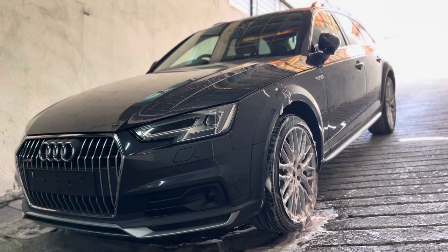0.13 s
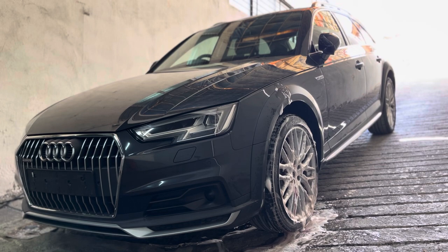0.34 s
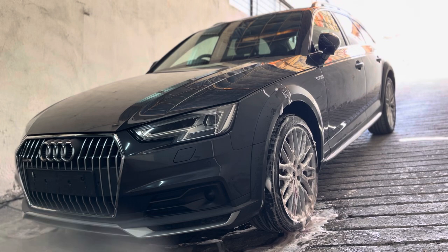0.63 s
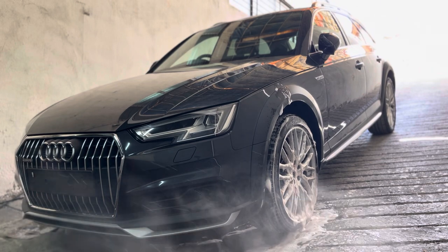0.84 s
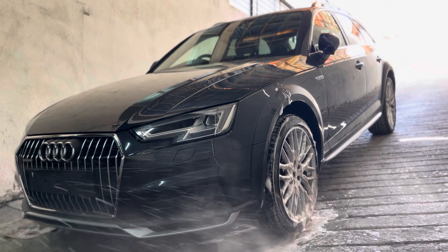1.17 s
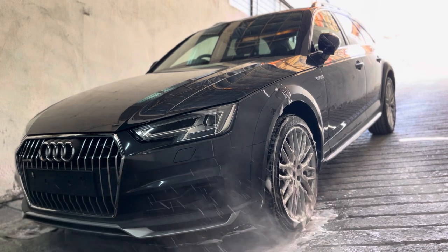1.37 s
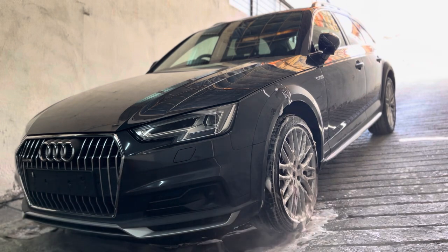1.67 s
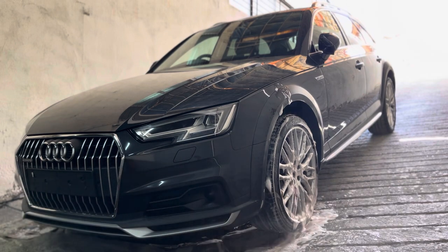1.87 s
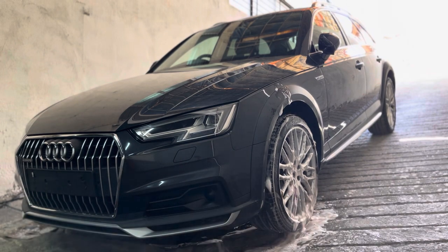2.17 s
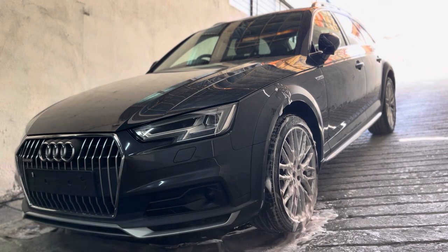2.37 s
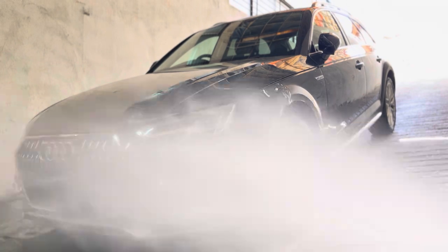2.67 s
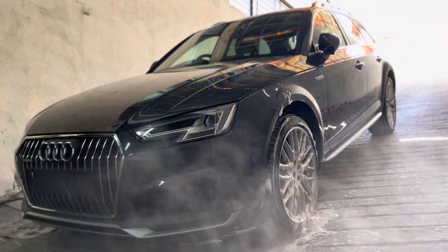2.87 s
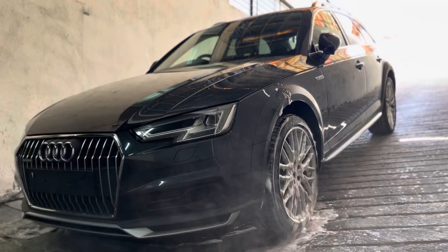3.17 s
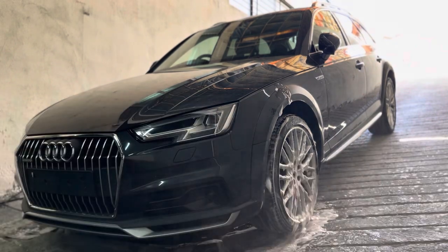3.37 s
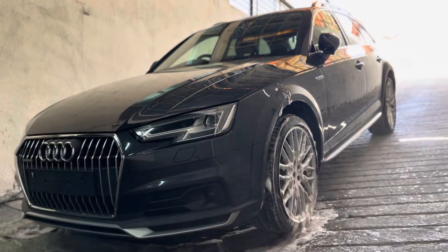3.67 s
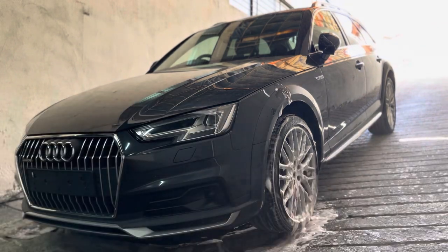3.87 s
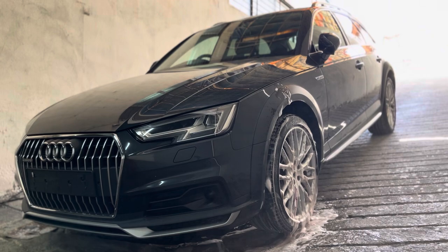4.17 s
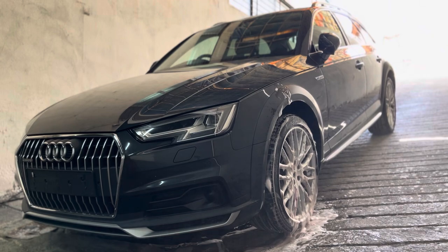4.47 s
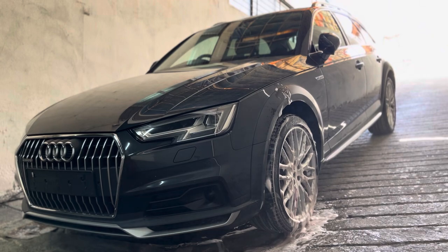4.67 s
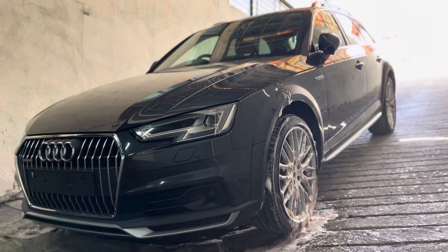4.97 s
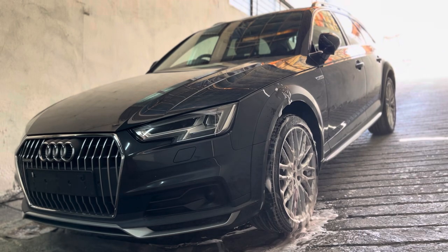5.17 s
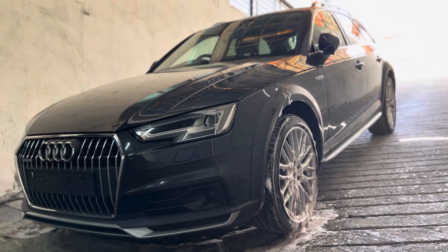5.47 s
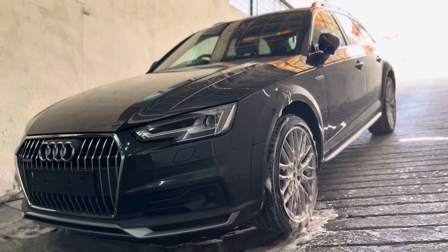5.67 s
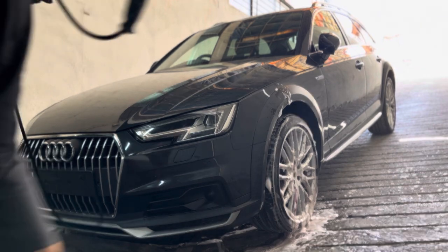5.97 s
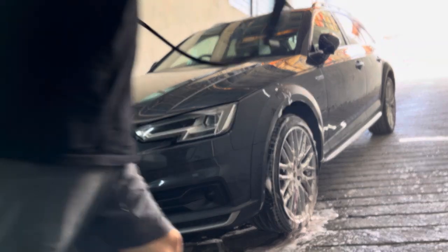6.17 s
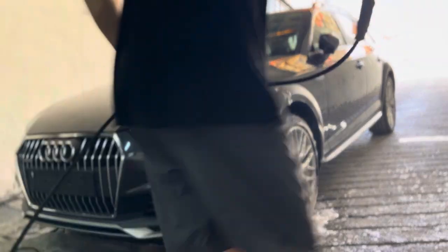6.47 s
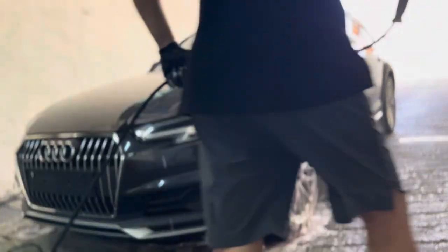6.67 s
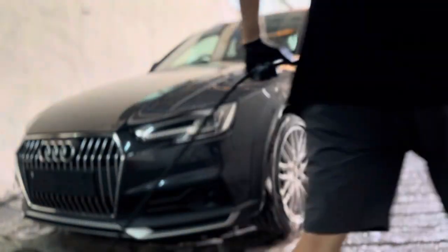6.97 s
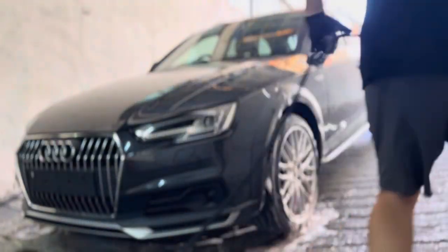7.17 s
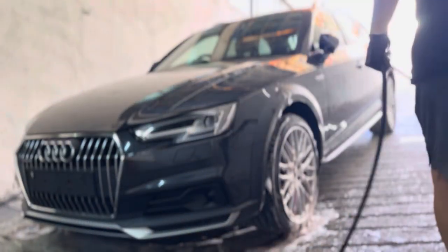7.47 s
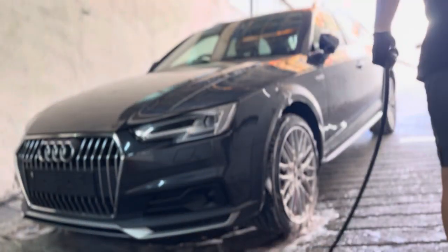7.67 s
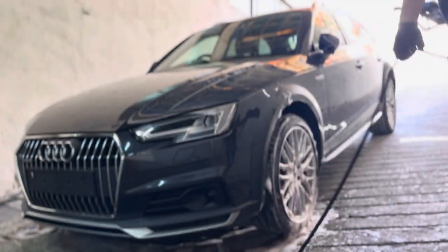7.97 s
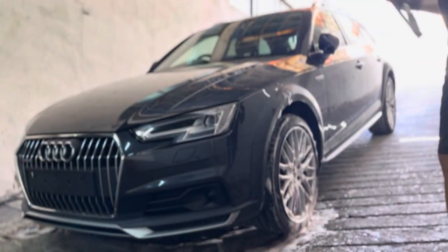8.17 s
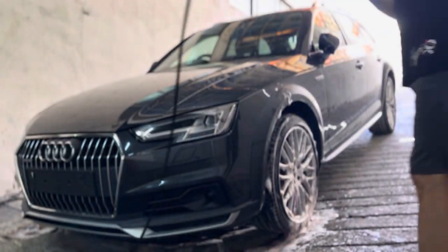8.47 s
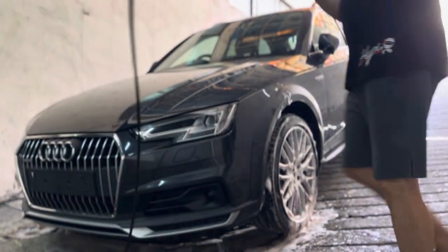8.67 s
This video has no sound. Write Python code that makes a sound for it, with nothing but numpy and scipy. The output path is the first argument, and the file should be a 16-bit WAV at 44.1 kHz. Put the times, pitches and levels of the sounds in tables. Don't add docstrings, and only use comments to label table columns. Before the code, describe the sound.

Brief high-pressure water blasts drum on bodywork with a throbbing pump and sharp trigger clicks, followed by quiet bay hum, metallic clatter and spits.

```python
import sys
import numpy as np
from scipy import signal
from scipy.fft import rfft, irfft, next_fast_len
from scipy.io import wavfile
from scipy.ndimage import uniform_filter1d

SR = 44100
rng = np.random.default_rng(int(sys.argv[2]) if len(sys.argv) > 2 else 0)


def convert_level_to_amplitude(level_db):
    exponent = np.asarray(level_db, float) / 20
    return 10 ** exponent


def dump(signal):
    limited = np.clip(np.atleast_2d(signal).T, -1, 1)
    pcm = np.round(limited * 32767).astype(np.int16)
    wavfile.write(sys.argv[1], SR, pcm)


N = 388771

# time_s, level_db
BUSTLE = [(0, 6), (.25, 3.5), (.5, 6.5), (1.2, 8.5), (1.7, 1.5), (1.91, 8), (2.02, 2.5), (2.3, 7.5),
          (3.17, 1.5), (3.9, 0), (5.3, -0.5), (5.65, 0), (5.82, 8), (6.2, 3.5), (6.8, 0.5), (7.55, 0),
          (7.9, -1.5), (8.82, -3.5)]
# freq_hz, density_db
RUMBLE_COLOUR = [(20, -35), (35, -8), (45, -1), (75, 1.5), (92, -0.5), (130, -7.5), (200, -11), (400, -52)]
MURMUR_COLOUR = [(100, -22), (250, 3.5), (500, -3.5), (1600, -5), (1800, -11.5), (3500, -22), (4500, -13.5),
                 (6000, -31.5), (15500, -89)]
TRICKLE_COLOUR = [(2500, -31.5), (4500, -3), (7000, 1.5), (10000, 0), (13000, -8.5), (15500, -22)]
HISS_COLOUR = [(300, -3), (900, 0), (1600, -0.5), (1800, -3), (3000, 1), (6000, -3), (9800, 2),
               (12500, -4.5), (15500, 0)]
# peak_s, level_db, rise_s, fall_s
RUNOFF_SWELLS = [
    (0, -78, .1, .4),
    (2.0, -63, 0.16, .02),
    (3.0, -70, .05, .2),
    (4.05, -67, 0.37, .08),
    (4.22, -63, .03, 0.025),
    (4.6, -65, .2, 0.045),
    (5.14, -87, .03, .3),
    (5.76, -79.5, .1, .02),
    (7.47, -78, .1, .15),
    (8.52, -72.5, 0.12, .15),
]
# peak_s, level_db, rise_s, fall_s
HUM_SWELLS = [
    (3.45, -47, 0.04, 0.3),
    (5.18, -32.5, 1.9, 0.19),
    (5.9, -32.5, 0.061, 0.71),
    (6.5, -33.5, 0.43, 0.13),
    (6.82, -38.5, .05, 0.038),
    (7.2, -34, 0.043, 0.12),
    (7.76, -33.5, .04, 0.028),
    (7.92, -36, .04, 0.23),
    (8.52, -38.5, 0.13, .4),
]
# time_s, firing_hz
ENGINE_SPEED = [(4.3, 98.96), (4.7, 99), (5.7, 94.07), (6.5, 92.73), (7.3, 85.2), (7.7, 78)]
# peak_s, level_db, rise_s, fall_s
ENGINE_FIRST = [
    (4.7, -41, 0.087, 0.44),
    (5.75, -35, 0.033, 0.27),
    (6.52, -40, 0.15, 0.45),
    (7.25, -41, .05, 0.12),
]
ENGINE_SECOND = [
    (5.63, -46, 0.65, .2),
    (5.95, -47, 0.17, .25),
    (6.92, -45.5, 0.3, 0.13),
    (7.43, -48.5, 0.101, 0.17),
]
# time_s, pitch_hz, level_db
MOTOR_DRONE = [(0, 70.7, -40), (0.62, 78.1, -34.5), (0.76, 91.1, -36.5), (1.17, 83.1, -41),
               (1.4, 76.37, -46.5), (2.43, 76.3, -29.5), (2.59, 84.4, -42), (2.67, 75.2, -30.5),
               (3.2, 69, -50.5)]
# start_s, level_db, pitch_hz, t60_s
THUMPS = [
    (1.5, -32, 175.3, 0.29),
    (2.294, -23, 277, .1),
    (2.648, -12, 68.7, 0.077),
    (5.792, -40, 98, 0.16),
    (5.8, -29.5, 448, 0.16),
    (7.905, -29, 270, 0.033),
    (7.908, -32.5, 110.5, 0.13),
    (8.446, -25, 159, 0.066),
    (8.444, -35.5, 423, 0.06),
]
# start_s, level_db, pitch_hz, t60_s
METAL_FITTINGS = [
    (5.656, -46.5, 2180, .17),
    (5.656, -53, 1050, .1),
    (6.27, -36.5, 4720, .36),
    (6.3, -39, 1290, .38),
    (6.256, -37.5, 2380, .3),
]
# start_s, peak_db, ring_hz, treble_db
HOSE_TICKS = [
    (0.4492, -45, 8002, -2),
    (.467, -41, 7100, -10),
    (1.873, -39.5, 9500, -1.5),
    (5.17, -58, 9100, -8),
    (5.7462, -41, 4000, -6.5),
    (6.093, -52, 6500, 9),
    (6.95, -55, 7000, -1),
]
# start_s, peak_db, ring_hz, treble_db, bass_db
LANCE_CRACKS = [
    (.502, -43, 2960, 3.5, 7),
    (3.576, -50.5, 3650, -6, -21),
    (5.269, -59, 6500, 1, -9),
    (5.614, -51, 2090, -9, 6),
    (5.7722, -18.5, 4830, 5.5, -0.5),
    (6.2495, -25, 3460, -1, 1.5),
    (8.4383, -33, 1730, -4, 5),
]
# start_s, peak_db, ring_hz, bass_db, t60_s
DULL_KNOCKS = [(1.9536, -31.5, 1200, -14, .04), (5.658, -46, 2435, 4.5, 0.099),
               (5.659, -57, 3950, -32.5, .06), (5.7728, -22, 2470, -2.5, 0.07),
               (5.773, -25, 3390, -46.5, 0.05), (5.917, -31.5, 2440, 1, 0.079),
               (6.251, -23.5, 2850, -46, 0.22), (6.2515, -28.5, 1410, -36, 0.17),
               (7.902, -42, 1640, -1, 0.1), (7.9005, -41, 3370, -5, 0.045), (8.439, -39.5, 2690, -33, .03),
               (8.44, -30, 1140, -12, 0.051), (8.538, -53, 1100, -5, .07)]
# start_s, peak_db, treble_db, bass_db, length_s
NOZZLE_SPITS = [(0.101, -35, -12, -6, 0.093), (0.1366, -32, -16, -27, 0.14), (0.248, -40, -30, -11.5, 0.16),
                (0.902, -27, 5, -6, 0.11), (1.815, -36.5, -12, -3.5, 0.26), (1.9534, -25, 6.5, -7, 0.049),
                (2.198, -25.5, 8.5, -1.5, 0.059), (3.786, -36.5, -1, -1, 0.053),
                (4.068, -22, -6.5, -9, 0.055), (4.965, -38, 3.5, 5, 0.045), (6.256, -39.5, 9, -10, .12),
                (7.388, -34, -1.5, -4, 0.073), (7.9015, -24.5, -5.5, -1.5, 0.044),
                (7.979, -38, -7.5, -19, 0.087)]
# start_s, peak_db, ring_hz, t60_s
TRIGGER_CLICKS = [
    (0.9041, -20, 2670, 0.058),
    (.9882, -19.5, 3060, 0.06),
    (1.9539, -15, 2880, 0.055),
    (2.1959, -23, 2800, 0.15),
    (2.629, -18.5, 3400, 0.059),
    (5.811, -27, 3750, 0.074),
    (7.27, -41, 3520, 0.095),
    (8.578, -43.5, 3150, 0.1),
]
# start_s, stop_s, third_order_db, higher_orders_db
PUMP_LOADS = [
    (0.514, 0.646, -37, -31.5),
    (0.964, 1.093, -45.5, -33),
    (2.01, 2.14, -55, -40.5),
    (2.352, 2.64, -27, -33),
]
# order, level_db
STROKE_ORDERS = [(1, 5.5), (2, 0.5), (6, 1), (7, 4.5), (8, -3), (9, -3.5), (11, -14), (12, -11)]
# open_s, shut_s, hiss_db, drum_db, leaves_panel_s
TRIGGER_PULLS = [
    (0.508, 0.64, -26, -26.5, 0.69),
    (0.958, 1.103, -27, -27, 1.123),
    (1.103, 1.75, -75.5, -47.5, 1.75),
    (2.066, 2.098, -23.5, -24, 2.18),
    (2.106, 2.347, -49.5, -34, 2.33),
    (2.337, 2.651, -25, -18.5, 2.54),
]
# freq_hz, width_hz, level_db
PANEL_MODES = [(310.6, 180, -4.5), (421.5, 190, 6.5), (525, 190, -7), (810, 590, 3), (1210, 103, 3.5),
               (1400, 110, -9.5)]
# freq_hz, t60_s
BAY_DECAY = [(100, 1.6), (500, 1.056), (1500, 1.45), (4000, 1.104), (9000, 0.75), (15000, 0.65)]
# freq_hz, level_db
TAIL_COLOUR = [(100, 3), (600, 7.5), (3000, -1), (8000, 1), (15000, -8)]
# freq_hz, likeness_0_to_1
PORT_LIKENESS = [(60, .99), (300, .78), (800, .55), (1500, .55), (2500, .6), (5000, .4), (7000, .6),
                 (7700, .97), (8800, .97), (9500, .75), (10400, .75), (11100, .97), (13000, .97),
                 (13600, .6), (14600, .97)]
# freq_hz, phase_rad
PORT_LEAD = [(0, 0), (450, 0), (750, 2.5), (1000, 3), (1650, 3.5), (1750, .6), (4900, 1), (5600, -1.2),
             (7000, -1.9), (7700, -np.pi), (8800, -np.pi), (11000, -2 * np.pi), (13000, -2 * np.pi),
             (14600, -3 * np.pi)]
# freq_hz, level_db
PORT_LEAN = [(60, -0.5), (110, -0.5), (200, -3), (380, 0.5), (700, -1), (1290, -1.5), (2380, 2),
             (4400, 5.5), (8120, 2), (15000, 2)]

STROKE_HZ, HUM_HZ, SPIT_HZ = 46.9, 57.5, 3270
BUILD_DB, BUILD_S, DRUM_BUILD_S, GLANCE_DB = 26, 0.036, 0.085, -17.5
LOAD_DB, LOAD_S, UNLOAD_DB_PER_S = 20.5, 0.09, 162
RUMBLE_DB, MURMUR_DB, RUNOFF_DB = -40.5, -49.5, -78
TICK_BASS_DB, TICK_S, CRACK_S, KNOCK_TREBLE_DB = -27, 0.045, 0.047, -37.5
TRIGGER_TREBLE_DB, TRIGGER_BASS_DB = -19, -22


def evened(x):
    return x / np.sqrt(np.mean(x ** 2) + 1e-20)


def read(points, hz):
    f, value = np.transpose(points)
    return np.interp(np.log(hz + 1), np.log(f + 1), value)


def columns(rows):
    s, *rest = np.transpose(rows)
    t = np.arange(N) / SR
    covered = 1. * ((t > s[0]) & (t < s[-1]))
    return [np.interp(t, s, c) for c in rest], uniform_filter1d(covered, 300)


def add(mix, start_s, sound):
    part = mix[:, round(start_s * SR):][:, :sound.shape[1]]
    part += sound[:, :part.shape[1]]


def band(x, hz, width_hz):
    return signal.lfilter(*signal.iirpeak(hz, hz / width_hz, SR), x)


def steep_band(x, hz, width_hz):
    return band(band(x, hz, width_hz), hz, width_hz) * np.sqrt(2 * SR / np.pi / width_hz)


def noise(colour, patchy_db, flicker_db, size=512):
    hop = size // 4
    frames, hz = N // hop + 5, np.fft.rfftfreq(size, 1 / SR)
    z = rng.standard_normal((frames, len(hz), 5)).T
    patches = uniform_filter1d(z[4], size=6, axis=0)
    patches = evened(uniform_filter1d(patches, size=16, axis=1))
    flicker = evened(uniform_filter1d(rng.standard_normal(frames), size=3))
    field = convert_level_to_amplitude(read(colour, hz)[:, None] + patchy_db * patches + flicker_db * flicker)
    sound = signal.istft((z[:2] + 1j * z[2:4]) * field, nperseg=size, noverlap=size - hop)[1]
    return evened(sound[:, :N])


def tone(hz, waver_rad):
    drift = evened(uniform_filter1d(rng.standard_normal(N), size=6000))
    phase = 2 * np.pi * np.cumsum(hz * np.ones(N)) / SR
    return np.sqrt(2) * np.sin(phase + waver_rad * drift)


def swells(rows):
    t = np.arange(N) / SR
    total = 0
    for s, db, rise_s, fall_s in rows:
        total = total + convert_level_to_amplitude(db) * np.exp(-np.where(t < s, (s - t) / rise_s, (t - s) / fall_s))
    return total


def building(start_s, stop_s, deficit_db, time_s, drop_db_per_s=1e4):
    t = np.arange(N) / SR
    climb_db = -deficit_db * np.exp(-(np.clip(t, start_s, stop_s) - start_s) / time_s)
    db = climb_db - drop_db_per_s * np.clip(t - stop_s, 0, 1)
    return uniform_filter1d(convert_level_to_amplitude(db) * (t > start_s), size=300)


def air():
    (bustle_db,), _ = columns(BUSTLE)
    rumble = convert_level_to_amplitude(RUMBLE_DB + bustle_db) * noise(RUMBLE_COLOUR, patchy_db=0.5, flicker_db=2.0, size=4096)
    murmur_gain = convert_level_to_amplitude(MURMUR_DB + 0.64 * bustle_db)
    murmur = murmur_gain * noise(MURMUR_COLOUR, patchy_db=1.06, flicker_db=0.16, size=1024)
    trickle_gain = convert_level_to_amplitude(4.5) * (convert_level_to_amplitude(RUNOFF_DB) + swells(RUNOFF_SWELLS))
    trickle = trickle_gain * noise(TRICKLE_COLOUR, patchy_db=-2.0, flicker_db=2.5, size=256)
    return rumble + murmur + trickle


def drones():
    (motor_hz, motor_db), on = columns(MOTOR_DRONE)
    motor = tone(uniform_filter1d(motor_hz, size=9000), waver_rad=0.19)
    motor = uniform_filter1d(on, size=4000) * convert_level_to_amplitude(motor_db) * motor
    hum = swells(HUM_SWELLS) * tone(HUM_HZ, waver_rad=0.6)
    (firing_hz,), running = columns(ENGINE_SPEED)
    engine = swells(ENGINE_FIRST) * tone(firing_hz, waver_rad=0.27)
    engine = engine + swells(ENGINE_SECOND) * tone(2 * firing_hz, waver_rad=0.45)
    engine = engine + convert_level_to_amplitude(-62.5) * tone(5 * firing_hz, waver_rad=1.56)
    return (motor + hum + running * engine) * [[1], [.1]]


def rings():
    out, t = np.zeros((2, N)), np.arange(20000) / SR
    for s, db, hz, t60_s in THUMPS + METAL_FITTINGS:
        rattle_rad = evened(uniform_filter1d(rng.standard_normal(len(t)), size=250)) * hz / 5000
        shape = convert_level_to_amplitude(db - 60 * t / t60_s) * np.minimum(t * hz / 0.36, 1)
        add(out, s, shape * np.sin(2 * np.pi * hz * t + rattle_rad) * [[1], [.4]])
    return out


def bursts(table, width_share, steep, rise_share, treble_share, gain_db):
    out, clicks, t = np.zeros((2, N)), np.zeros((1, N)), np.arange(8000) / SR
    for s, db, hz, treble_db, bass_db, length_s in table:
        parts = [(0, hz, width_share * hz, 1),  # level_db, freq_hz, width_hz, length share
                 (treble_db - 3.0, 5800, 5000, treble_share),
                 (treble_db, 10800, 8000, treble_share),
                 (bass_db, 750, 1200, 1.3)]
        for part_db, f, width_hz, share in parts:
            source = np.vstack([rng.standard_normal((2, len(t))), t == 0])
            sound = steep_band(source, f, width_hz)
            decay_db = 60 * (t / length_s / share) ** steep
            shape = convert_level_to_amplitude(db + part_db + gain_db - decay_db) * np.minimum(t / (rise_share * length_s), 1)
            add(out, s, sound[:2] * shape)
            add(clicks, s, sound[2:] * np.linalg.norm(shape))
    return out, clicks


def knocks():
    blows = [(*row, TICK_BASS_DB, TICK_S) for row in HOSE_TICKS]
    blows += [(*row, CRACK_S) for row in LANCE_CRACKS]
    blows += [(s, db, hz, KNOCK_TREBLE_DB, *rest) for s, db, hz, *rest in DULL_KNOCKS]
    return bursts(blows, width_share=0.68, steep=1, rise_share=0.02, treble_share=0.36, gain_db=3.0)


def spits():
    squirts = [(s, db, SPIT_HZ, *rest) for s, db, *rest in NOZZLE_SPITS]
    return bursts(squirts, width_share=0.83, steep=4.5, rise_share=0.08, treble_share=0.75, gain_db=-14.5)


def trigger():
    pulls = [(s, db, hz, TRIGGER_TREBLE_DB, TRIGGER_BASS_DB, t60_s) for s, db, hz, t60_s in TRIGGER_CLICKS]
    return bursts(pulls, width_share=0.31, steep=0.76, rise_share=0.017, treble_share=0.8, gain_db=0.5)


def pump():
    level = convert_level_to_amplitude(np.c_[[-53, -59]]) * building(0.5, 2.3, LOAD_DB, LOAD_S, UNLOAD_DB_PER_S)
    for start_s, stop_s, *dbs in PUMP_LOADS:
        level = level + convert_level_to_amplitude(np.c_[dbs]) * building(start_s, stop_s, LOAD_DB, LOAD_S, UNLOAD_DB_PER_S)
    upper = sum(convert_level_to_amplitude(db) * tone(k * STROKE_HZ, waver_rad=1.0) for k, db in STROKE_ORDERS)
    third = level[0] * tone(3 * STROKE_HZ, waver_rad=0.2)
    return third * [[.8], [2.6]] + level[1] * upper * [[1], [.3]]


def jet():
    hiss = noise(HISS_COLOUR, patchy_db=1.7, flicker_db=1.0)
    blows = rng.standard_normal((2, N))
    drum = evened(sum(convert_level_to_amplitude(db) * band(band(blows, hz, w), hz, 2 * w) for hz, w, db in PANEL_MODES))
    throb = 1 + 0.05 * np.cos(2 * np.pi * STROKE_HZ * np.arange(N) / SR)
    spray, struck = 0, 0
    for open_s, shut_s, hiss_db, drum_db, leaves_s in TRIGGER_PULLS:
        pressure = building(open_s, shut_s, BUILD_DB, BUILD_S)
        on_panel = building(open_s, leaves_s, BUILD_DB, DRUM_BUILD_S)
        spray = spray + convert_level_to_amplitude(hiss_db + 8.5) * pressure
        struck = struck + convert_level_to_amplitude(drum_db + 0.5) * (on_panel + convert_level_to_amplitude(GLANCE_DB) * pressure)
    return (spray * hiss + struck * drum) * throb


def bay(x):
    hz, t, z = signal.stft(rng.standard_normal((2, 2 * SR)), SR, nperseg=256)
    z = z * convert_level_to_amplitude(read(TAIL_COLOUR, hz)[:, None] - 60 * t / read(BAY_DECAY, hz)[:, None])
    tail = signal.istft(z, SR, nperseg=256)[1]
    tail = tail * np.clip((np.arange(tail.shape[1]) / SR - 0.008) / 0.0024, 0, 1)
    return signal.fftconvolve(x[:1], tail / np.linalg.norm(tail[0]), axes=1)[:, :N]


def scene():
    water, ringing = jet(), rings()
    pulled, pull_clicks = trigger()
    knocked, knock_clicks = knocks()
    spat, spit_clicks = spits()
    sent = convert_level_to_amplitude(-6.0) * water[:1] + convert_level_to_amplitude(-5.0) * ringing[:1]
    sent = sent + convert_level_to_amplitude(-7.5) * knock_clicks + convert_level_to_amplitude(-8.0) * pull_clicks + convert_level_to_amplitude(-3.0) * spit_clicks
    return air() + drones() + ringing + knocked + spat + pulled + pump() + water + bay(sent)


def band_limit(x):
    return signal.sosfilt(signal.butter(12, 15810, fs=SR, output="sos"), x)


def record(dry):
    size = next_fast_len(N)
    hz, spectra = np.fft.rfftfreq(size, 1 / SR), rfft(dry, size)
    shared, apart = spectra / (1 + (33 / (hz + 1)) ** 6)
    same, lean = read(PORT_LIKENESS, hz), convert_level_to_amplitude(read(PORT_LEAN, hz) / 2)
    lag = np.exp(-1j * np.interp(hz, *np.transpose(PORT_LEAD)))
    right = (same * shared + np.sqrt(1 - same ** 2) * apart) * lag
    mix = irfft(np.array([shared * lean, right / lean]), size)[:, :N]
    return band_limit(mix)


dry = scene()
out = record(dry)
dump(out)
```